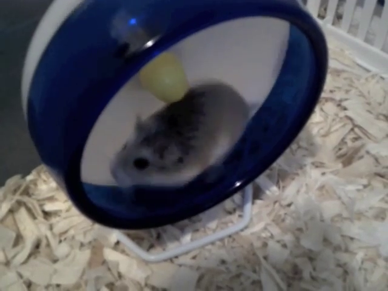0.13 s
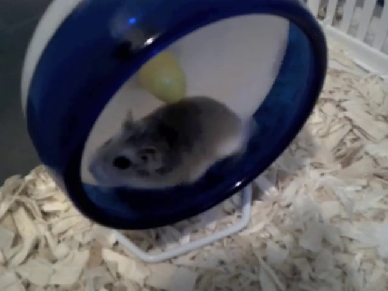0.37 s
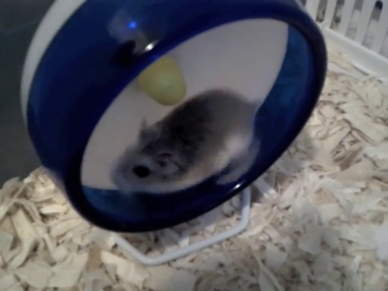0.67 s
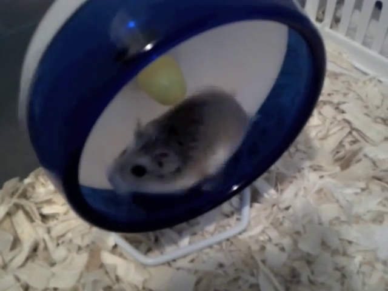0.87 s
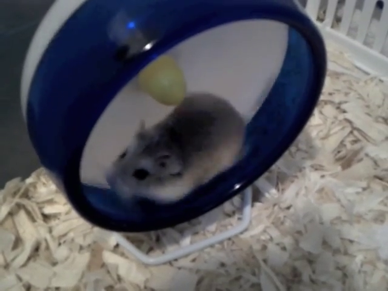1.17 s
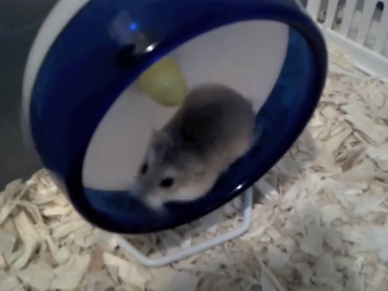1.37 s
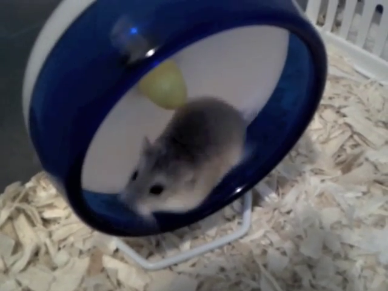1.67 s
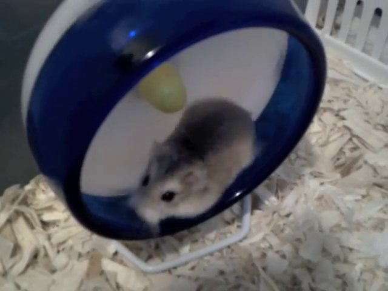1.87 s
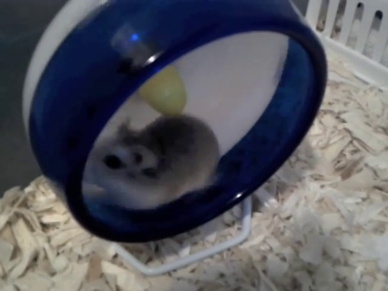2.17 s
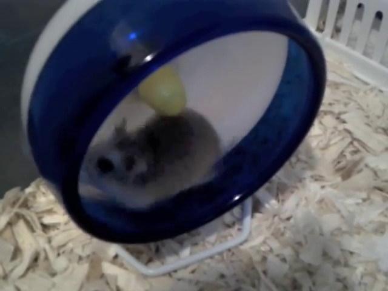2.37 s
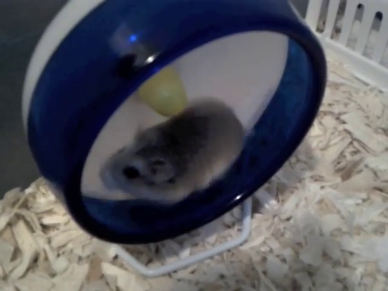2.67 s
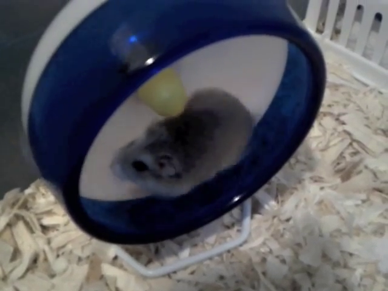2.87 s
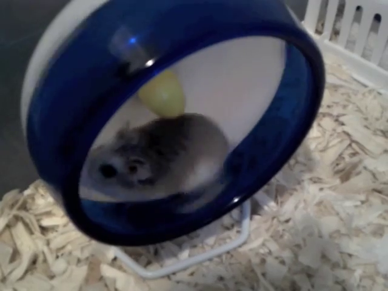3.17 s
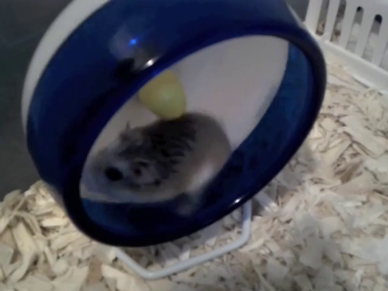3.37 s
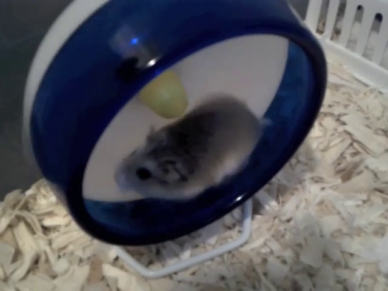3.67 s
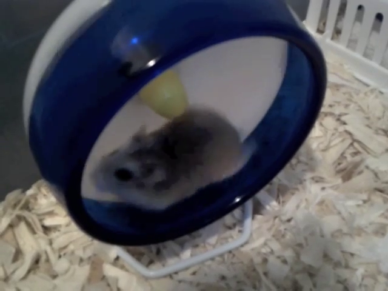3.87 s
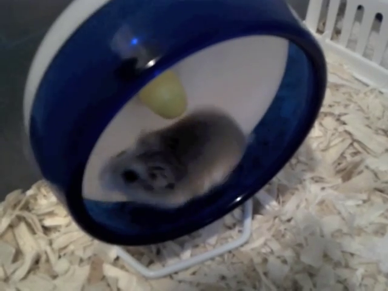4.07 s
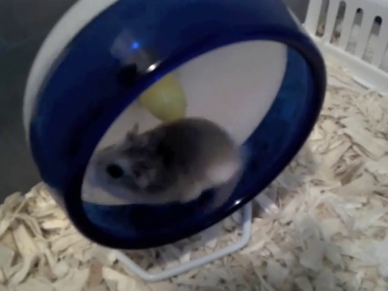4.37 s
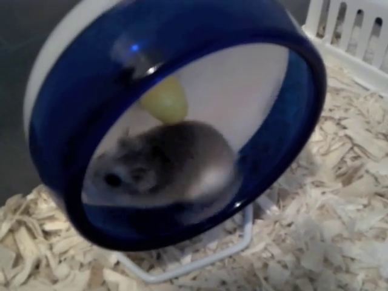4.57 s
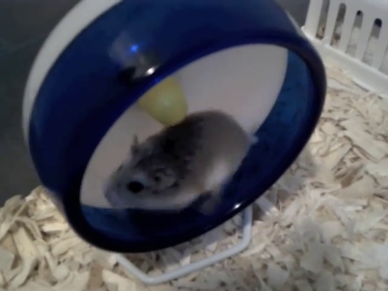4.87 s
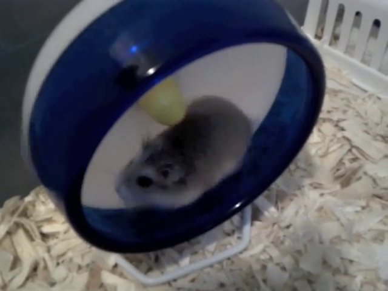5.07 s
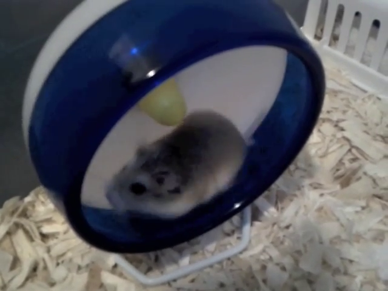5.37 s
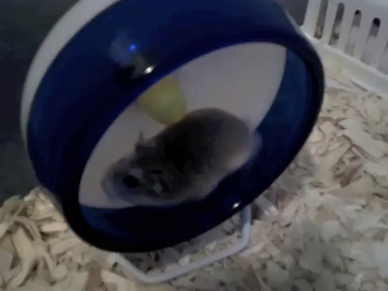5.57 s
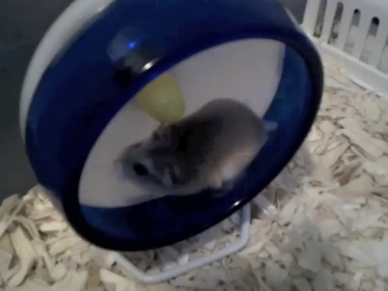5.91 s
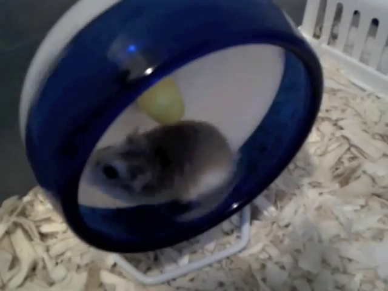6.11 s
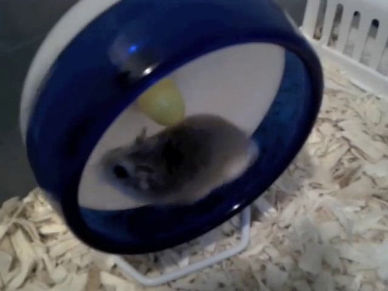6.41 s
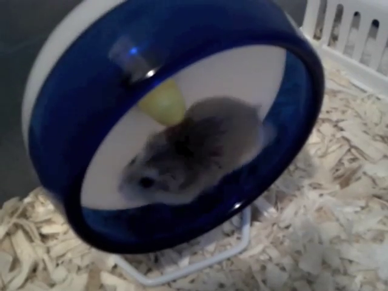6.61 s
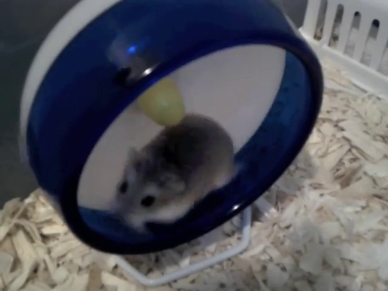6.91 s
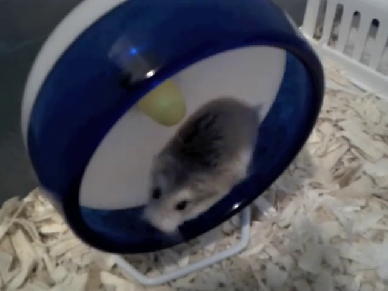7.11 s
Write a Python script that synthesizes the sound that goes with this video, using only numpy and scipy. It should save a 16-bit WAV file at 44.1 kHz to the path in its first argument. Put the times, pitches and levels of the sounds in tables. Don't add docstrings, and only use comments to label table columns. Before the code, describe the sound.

Close up in a humming room, a hamster runs in a plastic wheel. Tiny claws tick, stamp and scrape quickly and unevenly while the drum whirrs and knocks on its axle. Brief squeaks come in the second half, then a motor shudders on and buzzes under the running until the pace eases at the end. The sound is slightly dull, with no extreme treble.

```python
import sys
import numpy as np
from scipy import signal
from scipy.fft import rfft, irfft
from scipy.io import wavfile

SR = 44100
rng = np.random.default_rng(int(sys.argv[2]) if len(sys.argv) > 2 else 0)


def ratio_of_db(decibels):
    return 10 ** (np.asarray(decibels, float) / 20)


def to_wav(s):
    ch = np.atleast_2d(s).T
    pcm = np.round(np.clip(ch, -1, 1) * 32767)
    wavfile.write(sys.argv[1], SR, pcm.astype(np.int16))


N = 319725

# (time [s], axle load as whirr level [dB], pace as claw patter level [dB])
RUN_EFFORT = [(0.0, -52, -56), (0.44, -54.5, -54), (0.58, -49.5, -55.5), (0.97, -54, -55),
              (1.09, -54.5, -56.5), (1.92, -59.5, -60), (2.34, -54, -52.5), (2.52, -53.5, -56.5),
              (3.25, -53, -55), (4.12, -53.5, -57), (4.36, -52, -53), (4.78, -52, -54),
              (5.51, -55.5, -56.5), (5.79, -52.5, -55.5), (6.04, -56, -58), (6.48, -54, -58.5),
              (7.11, -60.5, -60), (7.25, -69.5, -60.5)]
# (frequency [Hz], level [dB], t60 [s])
SHELL_MODES = [(1964, 0, 0.0094), (2042, -4, 0.032), (2213, -8, .03), (2455, -7, 0.012), (2810, -14, 0.02),
               (3100, -18.5, 0.007), (3287, -8.5, 0.015)]


def rms_one(x):
    return x / np.sqrt(np.mean(x ** 2) + 1e-20)


def in_time(rows):
    s, *columns = np.transpose(rows)
    return [np.interp(np.arange(N) / SR, s, column) for column in columns]


def drift(rate_hz):
    r = np.exp(-2 * np.pi * rate_hz * 40 / SR)
    noise = rng.standard_normal(N // 40 + 2002)
    slow = rms_one(signal.lfilter([1], [1, -2 * r, r * r], noise)[2000:])
    return np.interp(np.arange(N) / 40, np.arange(len(slow)), slow)


def ring(force, hz, t60):
    r = ratio_of_db(-60 / (t60 * SR))
    w = 2 * np.pi * hz / SR
    return signal.lfilter([0, np.sin(w)], [1, -2 * r * np.cos(w), r * r], force + 1e-18)


def band(x, low_hz, high_hz):
    sos = signal.butter(2, [low_hz, high_hz], "band", fs=SR, output="sos")
    return rms_one(signal.sosfilt(sos, x))


def struck(times, levels_db, modes, favoured_hz, scrape_s, spread_db, focus_db, snap_db):
    age = np.arange(900) / SR
    scrape_s = np.clip(scrape_s, 5e-4, 8e-3)[:, None]
    scrapes = rng.standard_normal((len(times), len(age))) * np.sqrt(age) * np.exp(-age / scrape_s)
    where = np.round((times[:, None] + age - scrape_s / 2) * SR).astype(int)
    where = np.clip(where, 0, N - 1)
    uneven = rng.standard_normal((len(times), len(modes)))

    direct = np.zeros(N)
    peaks = np.abs(scrapes).max(axis=1, keepdims=True)
    np.add.at(direct, where, ratio_of_db(levels_db + snap_db)[:, None] * scrapes / peaks)
    span_hz = [modes[0][0] * 0.83, modes[-1][0]]
    out = signal.sosfilt(signal.butter(2, span_hz, "band", fs=SR, output="sos"), direct)

    for k, (hz, mode_db, t60) in enumerate(modes):
        octaves_off = np.minimum(np.abs(np.log2(hz / favoured_hz)), 0.3)
        drive = np.abs(scrapes @ np.exp(-2j * np.pi * hz * age))
        mode_levels_db = levels_db + mode_db + spread_db * uneven[:, k] - focus_db * octaves_off
        gain = ratio_of_db(mode_levels_db) / (drive + 0.33 * drive.mean())
        force = np.zeros(N)
        np.add.at(force, where, gain[:, None] * scrapes)
        out += ring(force, hz, t60) * (-1) ** k
    return out


def grains(per_s, spread_db, modes, throb_db):
    sizes = ratio_of_db(spread_db * np.minimum(rng.exponential(1, N), 5)) * rng.choice([-1, 1], N)
    born = rng.random(N) < per_s / SR
    dealt = rng.integers(0, len(modes), N)
    force = sizes * born * ratio_of_db(throb_db * drift(8.4))
    out = np.zeros(N)
    for k, (hz, db, t60) in enumerate(modes):
        out += ratio_of_db(db) * ring(force * (dealt == k), hz, t60)
    return rms_one(out)


def room():
    # (frequency [Hz], level [dB per Hz])
    air_curve = [(15, -75), (25, -37.5), (225, -28), (300, -40), (322, -22), (355, -16), (391, -17.5),
                 (421, -31.5), (604, -23), (750, -24), (1370, -23.5), (2510, -40), (4930, -40.5),
                 (6900, -55), (7980, -89), (10400, -101), (17600, -120)]
    # (frequency [Hz], width [Hz], level [dB rms])
    duct_tones = [(58.2, 5.9, -68), (72.3, 16, -73.5), (119, 4.8, -69.5), (189.8, 42, -61),
                  (227.7, 18, -61), (257.3, 13, -62.5), (303.5, 19, -62), (395.3, 2.8, -62.5),
                  (454.4, 72, -60), (595, 20, -62), (572.6, 58, -60), (636, 7.1, -66.5), (4260, 260, -68),
                  (5820, 3900, -71)]
    hz = np.maximum(np.fft.rfftfreq(N, 1 / SR), 1)
    curve_hz, curve_db = np.transpose(air_curve)
    shape = ratio_of_db(np.interp(np.log(hz), np.log(curve_hz), curve_db))
    out = ratio_of_db(-54.5) * rms_one(irfft(rfft(rng.standard_normal(N)) * shape, N))
    white = rng.standard_normal(N)
    for tone_hz, width, db in duct_tones:
        out += ratio_of_db(db) * band(white, tone_hz - width / 2, tone_hz + width / 2)
    return out


def hum():
    # (time [s], pitch [Hz], level [dB])
    hum_curve = [(0.0, 359.1, -34.5), (0.1, 359.6, -34), (5.67, 360.5, -34.5), (5.92, 360.4, -36),
                 (7.25, 359.7, -35)]
    hz, level_db = in_time(hum_curve)
    phase = 2 * np.pi * np.cumsum(hz) / SR
    return np.sqrt(2) * ratio_of_db(level_db + 0.11 * drift(6.0)) * np.cos(phase)


def motor():
    multiples = [3, 4, 14, 33, 39, 43, 45, 46, 48, 51]
    partial_db = [-59, -63.5, -59.5, -76, -72, -73.5, -74, -77, -71, -70]
    # (time [s], peak [dB], rise [dB per s], fall [dB per s])
    jolts = [
        (5.657, -44, 151, 93.5),
        (5.764, -60.5, 143, 261),
        (5.862, -46, 276, 108),
    ]
    # (time [s], length [s], third partial [dB], fourth partial [dB], housing partial [dB])
    spells = [
        (5.68, 0.42, -1, 2, -9),
        (6.2, 0.38, 0, 3, -6.5),
        (6.568, .22, -20, 1.5, -2.5),
        (6.79, 0.21, -1, 11, 0),
        (7.01, .3, -15, -1, -2.5),
    ]
    # (full at [s], rise [dB per s], eases at [s], fall [dB per s])
    buzz_course = (5.9, 94, 7.0, 24)
    t = np.arange(N) / SR
    full_s, rise, ease_s, fall = buzz_course
    buzz = ratio_of_db(-rise * np.maximum(full_s - t, 0) - fall * np.maximum(t - ease_s, 0))

    loads = np.zeros((3, N))
    for s, length, *db in spells:
        inside = np.clip(0.5 + np.minimum(t - s, s + length - t) / 0.037, 0, 1)
        loads += inside * ratio_of_db(db)[:, None]
    third, fourth, housing = loads
    low_loads = {3: third, 4: fourth, 14: housing * np.minimum(2 * buzz, 1) + buzz / 4}

    turn = 2 * np.pi * 59.2 * t
    out = np.zeros(N)
    for multiple, db in zip(multiples, partial_db):
        level = np.sqrt(2) * low_loads.get(multiple, buzz) * ratio_of_db(db + 2.9 * drift(3.3))
        out += level * np.sin(multiple * turn + rng.uniform(0, 2 * np.pi))

    shudder = np.zeros(N)
    for s, db, rise, fall in jolts:
        shudder += ratio_of_db(db - np.maximum(rise * (s - t), fall * (t - s)))
    rumble = band(band(rng.standard_normal(N), 160, 280), 160, 280)
    rattle = buzz * ratio_of_db(-68.0) * band(rng.standard_normal(N), 2400, 2700)
    return out + rattle + shudder * rumble


def squeaks():
    # (time [s], length [s], level [dB], pitch [Hz])
    axle_squeaks = [
        (4.56, .05, -68, 1760),
        (5.168, 0.08, -57.5, 1770),
        (5.654, 0.091, -55, 1810),
    ]
    t = np.arange(N) / SR
    out = np.zeros(N)
    for s, length, db, hz in axle_squeaks:
        swell = np.clip(3.0 * np.sin(np.pi * np.clip((t - s) / length, 0, 1)), 0, 1)
        out += ratio_of_db(db) * swell * np.sin(2 * np.pi * hz * t)
    return out


def drum():
    # (time [s], peak [dB], strongest ring [Hz])
    axle_knocks = [(0.029, -40, 1120), (.06, -32.5, 1125), (0.215, -38, 1200), (0.384, -36, 1200),
                   (0.432, -38, 1080), (0.602, -36, 864), (0.91, -43, 1120), (1.068, -42, 1170),
                   (1.253, -40, 1150), (2.37, -36, 1250), (2.736, -42, 1120), (2.827, -41, 1150),
                   (3.193, -38, 1090), (3.285, -26.5, 880), (3.576, -33.5, 980), (3.76, -40, 1150),
                   (4, -38.5, 1110), (4.035, -33, 864), (4.134, -42, 1210), (4.306, -40, 1200),
                   (4.642, -41, 1030), (4.76, -36.5, 1150), (4.801, -42, 1200), (4.825, -38, 1200),
                   (4.943, -39, 1184), (5.27, -28.5, 955), (5.43, -34.5, 1120), (5.984, -37, 1100),
                   (6.839, -40, 1200), (6.866, -39, 1130)]
    # (frequency [Hz], level [dB], t60 [s])
    drum_modes = [(857, -1, 0.11), (980, -9, 0.11), (1042, 0.5, 0.041), (1120, 5, 0.075), (1200, 4, 0.09),
                  (1370, 2.5, 0.065), (1483, 1.5, 0.049)]
    s, db, hz = np.transpose(axle_knocks)
    loaded = [(f, g, 0.8 * t60) for f, g, t60 in drum_modes]
    blunt_s = np.full(len(s), 0.001)
    knocks = struck(s - 0.0025, db - 5, loaded, hz, blunt_s, spread_db=1.5, focus_db=38, snap_db=-4.0)
    whirr_db = in_time(RUN_EFFORT)[0]
    whirr = ratio_of_db(whirr_db - 0.5) * grains(per_s=1500, spread_db=3.0, modes=drum_modes, throb_db=1.5)
    shell_grains = grains(per_s=1600, spread_db=2.0, modes=SHELL_MODES, throb_db=2.0)
    return knocks + whirr + ratio_of_db(0.58 * whirr_db - 30.0) * shell_grains


def claws():
    # (time [s], peak [dB], strongest ring [Hz], shell level re peak [dB])
    stamps = [(.164, -43.5, 3930, 1), (.2174, -28.5, 4440, -3.5), (.3448, -43, 4860, 5),
              (.495, -41.5, 4900, -4), (.5302, -43.5, 4800, -1), (.5908, -40, 4560, -6),
              (.8143, -44, 4080, 6), (1.2521, -45.5, 4650, -1), (1.376, -45.5, 3710, 4.5),
              (1.8853, -37, 5100, -7), (1.9864, -43, 5100, 3.5), (2.3432, -28, 6240, -22),
              (3.1233, -32.5, 4500, -9), (3.145, -30.5, 4800, -6), (3.1929, -38.5, 5060, -5.5),
              (3.2789, -39.5, 5600, -3), (3.3085, -25.5, 4280, -9), (3.6052, -55, 5070, 6),
              (3.6513, -46, 4260, 0), (4.1614, -43.5, 4870, 5.5), (4.3405, -38, 4830, -8),
              (4.713, -38.5, 4850, 6), (4.8992, -45, 4800, 6), (5.269, -36.5, 4050, -11),
              (5.5475, -41.5, 5130, 2.5), (5.8436, -31.5, 6400, -1.5), (6.109, -33.5, 5280, -9),
              (6.1273, -37, 5650, -4.5), (6.2318, -41, 4240, -.5), (6.564, -40.5, 4260, 2)]
    # (time [s], peak [dB], strongest ring [Hz])
    ticks = [(0.1448, -36.5, 4730), (0.391, -44.5, 4860), (0.963, -35.5, 5230), (1.047, -38, 5100),
             (1.475, -46, 5970), (1.579, -45.5, 3800), (1.779, -45, 4670), (2.1838, -42.5, 5250),
             (2.2058, -36.5, 5940), (2.2473, -34.5, 5200), (2.2686, -36, 5090), (2.4411, -43, 4880),
             (2.8684, -36, 3790), (2.9634, -37, 5060), (3.7795, -39, 4160), (3.8681, -40.5, 4100),
             (3.986, -42, 4960), (4.0272, -38, 5090), (4.1137, -35.5, 5560), (4.255, -42.5, 3950),
             (4.3017, -41, 5860), (4.4099, -39, 5070), (4.5253, -34.5, 4730), (4.694, -37, 5640),
             (5.098, -35.5, 5270), (5.1522, -40, 5880), (5.5904, -41, 5090), (6.054, -33.5, 5000),
             (6.7146, -40.5, 4900), (7.1261, -32, 5840)]
    # (time [s], peak [dB], strongest ring [Hz], scrape [s])
    slides = [(.052, -48.5, 6570, 0.0053), (.586, -38.5, 7240, 0.01), (2.444, -42.5, 5400, 0.0051),
              (3.098, -45, 6800, 0.0042), (3.212, -41.5, 6500, .004), (5.554, -39, 6900, 0.0059),
              (5.853, -35.5, 6340, 0.0093), (6.103, -40, 7020, 0.0038)]
    # (frequency [Hz], level [dB], t60 [s])
    track_modes = [(3685, -3, 0.046), (4116, 0.5, 0.016), (4260, -5, 0.013), (4334, -7.5, 0.021),
                   (4850, -1.5, 0.026), (5090, -1, 0.026), (5770, -11, 0.035), (5522, -9.5, 0.043),
                   (5880, -7, .03), (6285, -1.5, 0.021), (6700, -6, 0.04), (6900, -2.5, 0.02),
                   (7320, -2.5, 0.017), (7750, -12.5, 0.034)]
    stamp_s, stamp_db, stamp_hz, stamp_shell_db = np.transpose(stamps)
    tick_s, tick_db, tick_hz = np.transpose(ticks)
    slide_s, slide_db, slide_hz, slide_length = np.transpose(slides)
    patter_db = in_time(RUN_EFFORT)[1]

    steps = 330
    chance = rng.random((steps, 3))
    step_s = (np.arange(steps) + chance[:, 0]) / steps * (N - 1) / SR
    step_db = patter_db[(step_s * SR).astype(int)] + 6 + 8.5 * chance[:, 1] ** 2
    step_hz = 4100 * 2 ** (0.85 * chance[:, 2])

    s = np.concatenate([stamp_s, tick_s, step_s])
    db = np.concatenate([stamp_db, tick_db, step_db])
    hz = np.concatenate([stamp_hz, tick_hz, step_hz])
    lengths = np.concatenate([np.full(len(s) - steps, 0.002), np.full(steps, 0.0015)])
    bright = struck(np.append(s, slide_s), np.append(db, slide_db) - 3.5, track_modes,
                    np.append(hz, slide_hz), np.append(lengths, slide_length),
                    spread_db=1.26, focus_db=29.5, snap_db=-0.5)

    shell_db = np.concatenate([stamp_shell_db, np.full(len(tick_s), -19), np.full(steps, -11)])
    shell_hz = 1933 * 2 ** (0.2 * rng.random(len(s)))
    body = struck(s, db + shell_db - 0.5, SHELL_MODES, shell_hz, lengths,
                  spread_db=-4.5, focus_db=27.5, snap_db=4.5)

    muffled = [(f, g, 0.62 * t60) for f, g, t60 in track_modes]
    rustle = grains(per_s=6000, spread_db=3.5, modes=muffled, throb_db=2.5)
    return bright + body + ratio_of_db(patter_db - 6.5) * rustle


def echoes(x):
    lag = np.arange(round(0.06 * SR)) / SR
    tail = rng.standard_normal(len(lag)) * np.exp(-lag / 0.0047) * (lag > 0.003)
    tail = tail / np.sqrt(np.sum(tail ** 2))
    return x + ratio_of_db(-7.0) * signal.fftconvolve(x, tail)[:N]


def scene():
    near = room() + echoes(claws()) + drum()
    near = near - 0.55 * signal.lfilter(*signal.iirpeak(1275, 12, fs=SR), near)
    return (hum() + motor() + squeaks() + near)[None]


def roll_off(x):
    return signal.sosfilt(signal.butter(12, 8130, fs=SR, output="sos"), x)


def record(dry):
    gentle = signal.butter(4, 7000, fs=SR, output="sos")
    steep = signal.cheby2(8, 15, 8300, fs=SR, output="sos")
    narrow = signal.sosfiltfilt(steep, signal.sosfiltfilt(gentle, dry))
    return roll_off(narrow)


dry = scene()
out = record(dry)
to_wav(out)
```